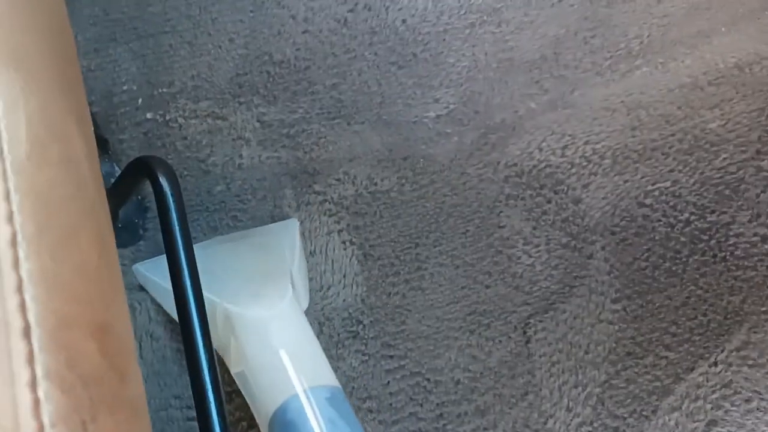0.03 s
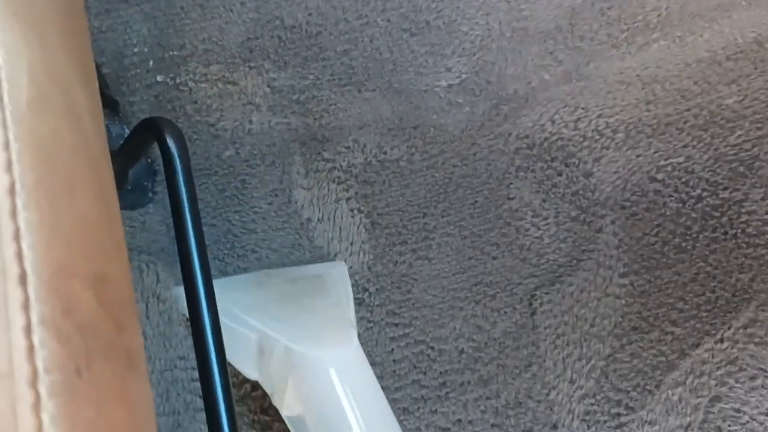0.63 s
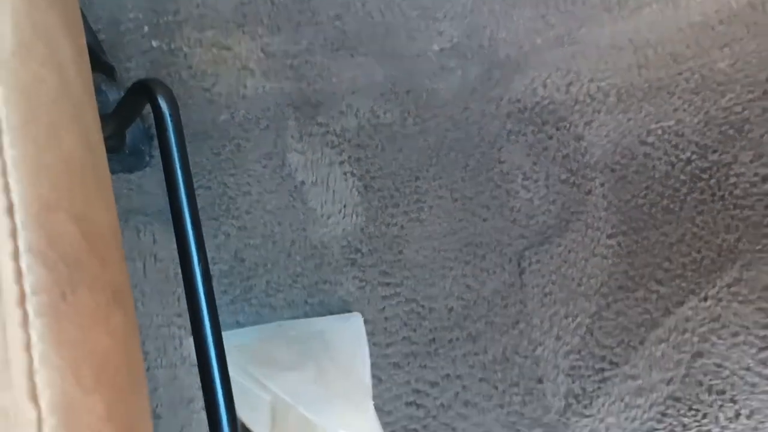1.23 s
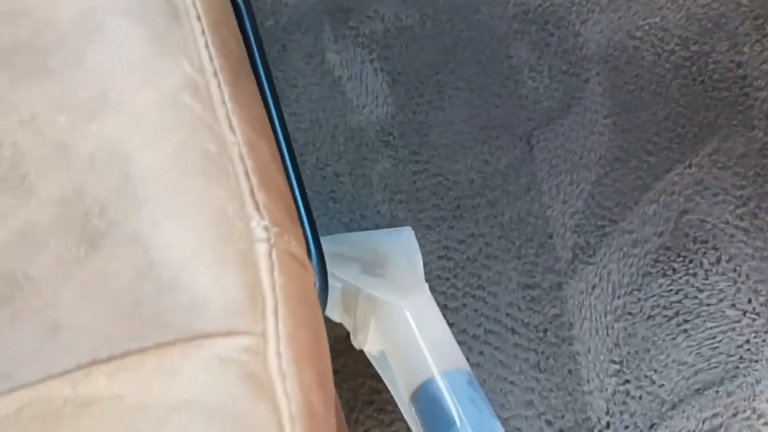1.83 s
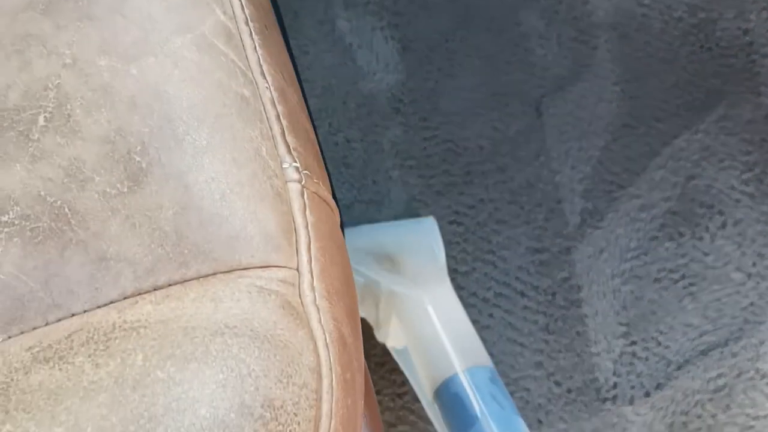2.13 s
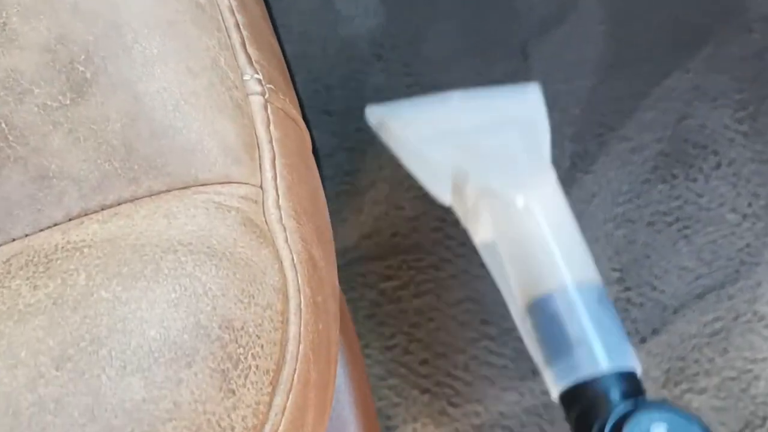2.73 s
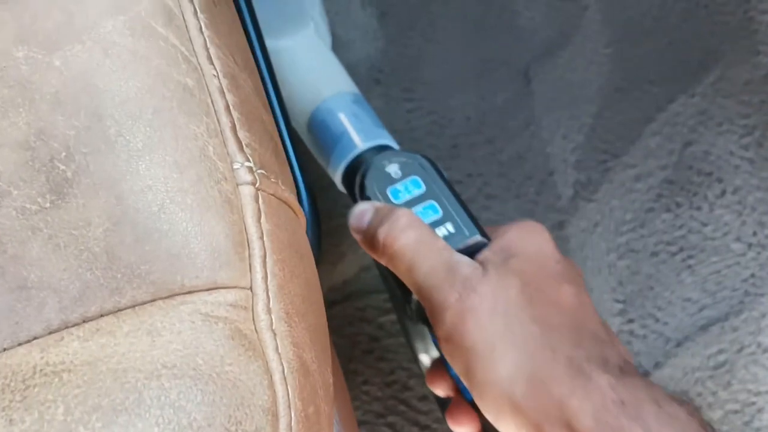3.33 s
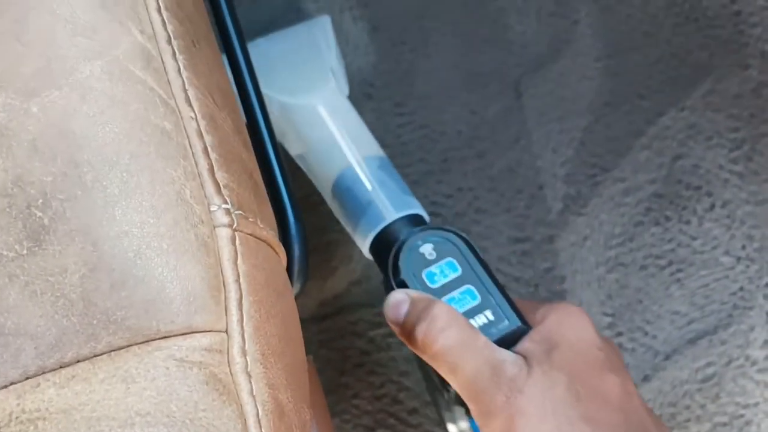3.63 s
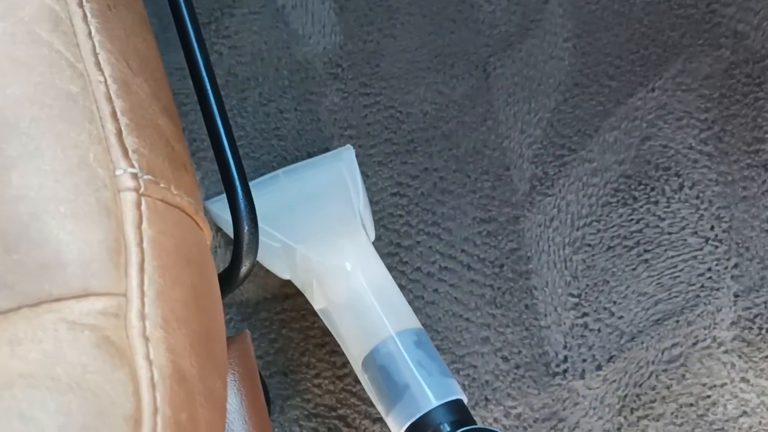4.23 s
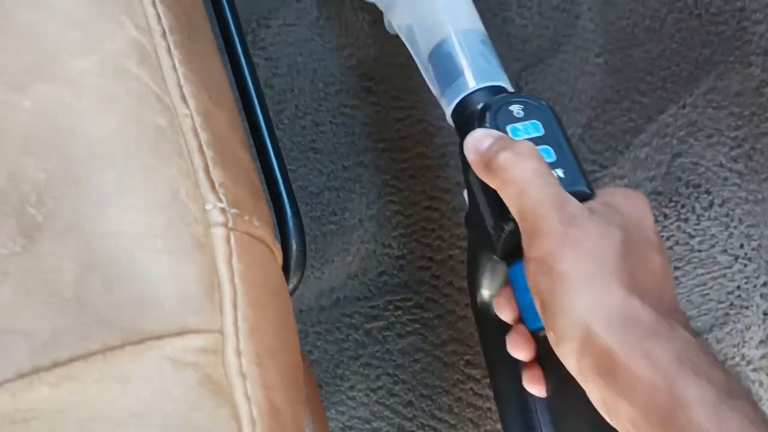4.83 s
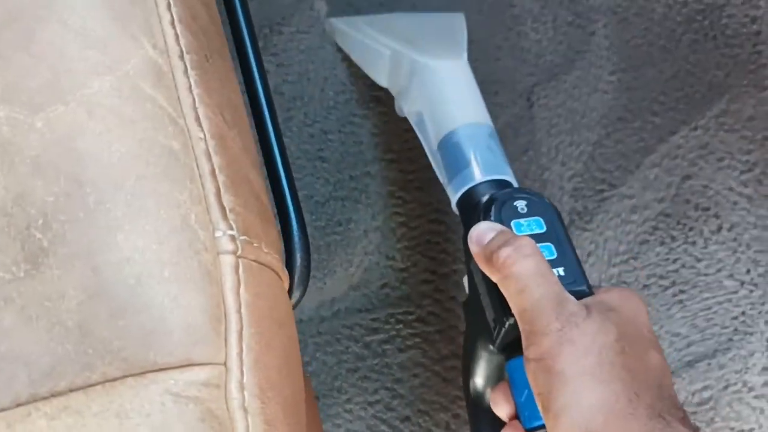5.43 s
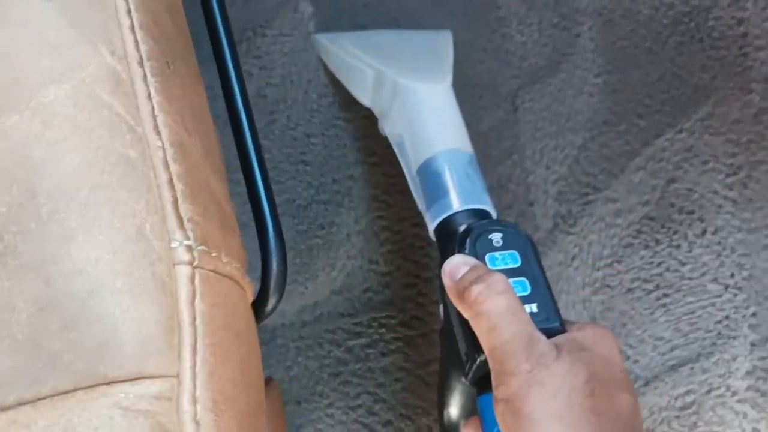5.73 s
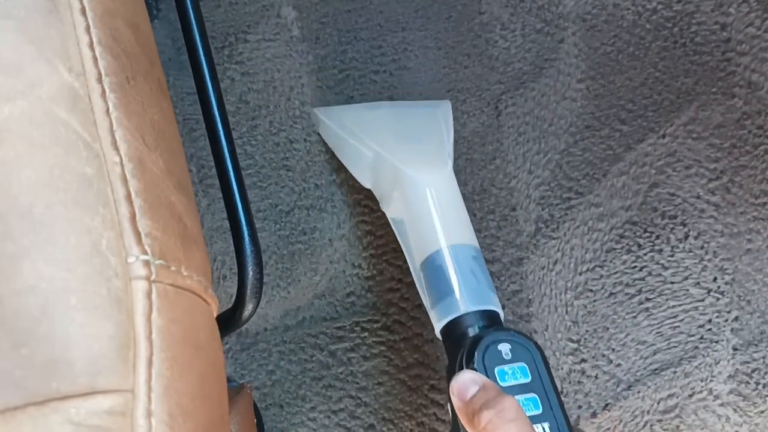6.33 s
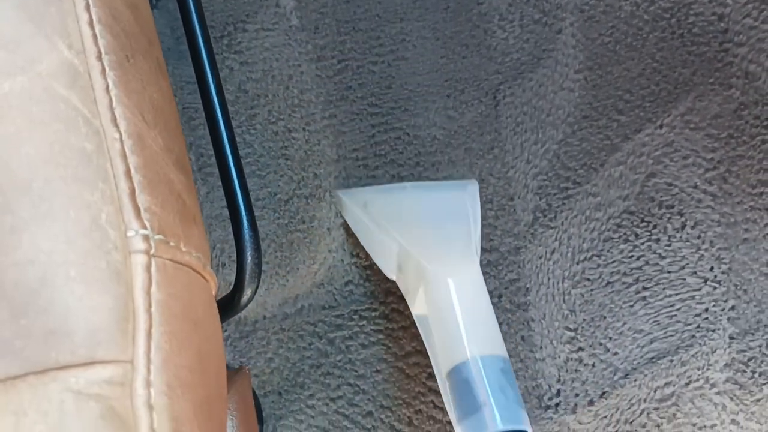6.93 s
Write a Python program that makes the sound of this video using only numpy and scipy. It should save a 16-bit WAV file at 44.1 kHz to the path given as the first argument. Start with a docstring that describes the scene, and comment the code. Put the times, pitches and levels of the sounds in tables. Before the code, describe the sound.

Loud, wet hiss of a vacuum nozzle on soaked carpet, whistling and slurping, then dropping as it seals and the motor whines.

```python
"""A loud, wet hiss with whistles and slurps: a wet vacuum draws water from a car footwell carpet, close up.
Air tears past the nozzle lip, coloured by how the nozzle lies, and sings in narrow wet gaps.
Behind it the hose roars, thumping when the flow is checked, and the motor hums. Twice the lip
seals on the carpet: the hiss falls and the unloaded motor speeds up and whines."""
import sys
import numpy as np
from scipy import signal
from scipy.fft import rfft, irfft, next_fast_len
from scipy.io import wavfile
from scipy.ndimage import uniform_filter1d

SR = 44100
rng = np.random.default_rng(int(sys.argv[2]) if len(sys.argv) > 2 else 0)


def transcribe(signal):
    """Save signal, clipped to [-1, 1], as a 16-bit WAV file at the path in sys.argv[1]."""
    frames = np.atleast_2d(signal).T
    limited = np.clip(frames, -1, 1)
    pcm = np.round(limited * 32767).astype(np.int16)
    wavfile.write(sys.argv[1], SR, pcm)


N = 308259
TIME = np.arange(N) / SR
FFT_SIZE = next_fast_len(N)
FREQS = np.maximum(np.fft.rfftfreq(FFT_SIZE, 1 / SR), 1)
TIP_OVER_S = 0.047

# Lip seals. Each row: start in seconds, initial grip (1 = settled), hold and release in seconds.
SEALS = [(2.555, 1.5, 0.026, .095), (5.004, 1.15, 1.1, 1.6)]
# Tilts onto the front lip. Each row: start, end and time to lie back in seconds, gulp in dB.
TILTS = [(0.614, 0.695, 1.4, -2), (2.75, 3.103, 0.041, 2), (4.64, 4.947, 0.038, 2)]
# Rumble of motor casing and shaking hose. Each row: frequency in Hz, relative level in dB.
RUMBLE_SPECTRUM = [(20, -46), (45, -22), (65, 3.5), (100, 4.5), (150, 0), (230, -3.5), (400, -19),
                   (1000, -36)]


def from_db(db):
    return 10 ** (np.asarray(db) / 20)


def rms(x):
    return np.sqrt(np.mean(x ** 2) + 1e-20)


def over_time(points):
    """Rows of (seconds, value) interpolated at every sample."""
    return np.interp(TIME, *np.transpose(points))


def over_freq(points):
    """Rows of (Hz, value) interpolated onto FREQS on a log axis."""
    hz, value = np.transpose(points)
    return np.interp(np.log(FREQS), np.log(hz), value)


def bell(offset, width):
    """Gaussian of height 1; full width at half height."""
    return np.exp2(-(2 * offset / width) ** 2)


def panned(x, pan_db):
    """Stereo; pan is left minus right level."""
    return x * from_db(np.array([[.5], [-.5]]) * pan_db)


def filtered(x, gain):
    """Apply a gain given on FREQS."""
    return irfft(rfft(x, FFT_SIZE) * gain, FFT_SIZE)[..., :N]


def complex_noise(shape):
    return rng.standard_normal(shape) + 1j * rng.standard_normal(shape)


def drift(rate_hz, step=32):
    """Slow random wander, rms 1."""
    hz = np.fft.rfftfreq(next_fast_len(N // step + 2, real=True), step / SR)
    slow = irfft(complex_noise(len(hz)) / (1 + (hz / rate_hz) ** 2))
    return np.interp(np.arange(N) / step, np.arange(len(slow)), slow / rms(slow))


def trapezoid(start_s, attack_s, hold_s, release_s):
    return np.interp(TIME, start_s + np.cumsum([0, attack_s, hold_s, release_s]), [0, 1, 1, 0])


def seal(close_s=0.017, settle_s=0.31):
    """Grip of the lip, 0 open, 1 settled; it snaps on tighter than it stays."""
    total = 0
    for start_s, grip, hold_s, release_s in SEALS:
        overshoot = (grip - 1) * np.exp(-np.maximum(TIME - start_s, 0) / settle_s)
        total += trapezoid(start_s, close_s, hold_s, release_s) * (1 + overshoot)
    return total


def tilt():
    """Tip of the nozzle onto its front lip, 0 to 1."""
    tips = sum(trapezoid(start_s - TIP_OVER_S / 2, TIP_OVER_S, end_s - start_s, back_s)
               for start_s, end_s, back_s, _ in TILTS)
    return np.minimum(tips, 1)


def pose_shares(tilt_share=0.75, rest_share=0.2):
    """Power shares of the poses: flat under the seat, pushed on the front lip, pulled, sealed."""
    # The nozzle is drawn clear of the seat. Each row: time in seconds, share of the flat pose.
    under_seat = [(0, 0.85), (2.5, 0.57), (2.9, 0.27), (3.2, 0.031)]
    sealed, flat = np.minimum(seal(), 1), over_time(under_seat)
    clear_of_seat = 1 - flat / flat.max()
    pushed = rest_share + tilt_share * tilt() * np.sqrt(clear_of_seat)
    open_shares = (flat, (1 - flat) * pushed, (1 - flat) * (1 - pushed))
    return [(1 - sealed) * share for share in open_shares] + [sealed]


def gulps_db(width_s=0.038, seal_db=2.5, seal_lead_s=0.026):
    """The lip gapes and gulps air before it tips, as it lies back and before it seals."""
    gulps = [(at_s, db) for start_s, end_s, back_s, db in TILTS
             for at_s in (start_s - width_s, end_s + TIP_OVER_S / 2 + back_s)]
    gulps += [(start_s - seal_lead_s, seal_db) for start_s, *_ in SEALS]
    return sum(db * np.exp(-((TIME - at_s) / width_s) ** 2) for at_s, db in gulps)


def choke_db(db_per_grip=-18):
    """The low rush drops while the grip is tighter than settled."""
    return db_per_grip * np.maximum(seal() - 1, 0)


def suction_db(open_slurp_db=-30.7, leak_exponent=2.8):
    """Slurp, hiss and spray levels: tilt trades slurp for hiss; a seal cuts all; hiss returns first."""
    # Lip flat and open; spray follows carpet wetness. Each row: time in seconds, level in dB.
    open_hiss = [(0, -24.5), (1.3, -24.5), (2.3, -26), (2.97, -25), (3.12, -26.5), (3.5, -26), (4.5, -25),
                 (6.99, -27.5)]
    open_spray = [(0, -24), (.55, -26.5), (1.1, -24.5), (2.45, -24.5), (3.45, -24.5), (3.57, -27.5),
                  (4.9, -24.5), (6.0, -26.5), (6.99, -29)]
    tilted, sealed = tilt(), seal()
    slurp_db = open_slurp_db - 4 * tilted - 3 * sealed + gulps_db() + choke_db()
    hiss_db = over_time(open_hiss) + tilted - 4.5 * sealed ** leak_exponent
    spray_db = over_time(open_spray) + 0.5 * tilted - 7.5 * sealed
    return slurp_db, hiss_db, spray_db


def turbulence(spectrum, peaks=(), wall_delay_s=.00083, wall_cutoff_hz=2900):
    """Stereo air noise through resonances, mono rms 1; a side wall makes each side lead in turn by band."""
    # Each row: frequency in Hz, left-right correlation.
    stereo_correlation = [(60, 0.43), (300, 1), (640, 0.5), (1100, -0.08), (1850, -0.25), (2450, 0.37),
                          (3100, -0.07), (7000, -0.04), (15000, 0)]
    level_db = over_freq(spectrum)
    for hz, width_hz, left_db, right_db in peaks:
        level_db = level_db + np.array([[left_db], [right_db]]) * bell(FREQS - hz, width_hz)
    correlation = over_freq(stereo_correlation)
    wall_share = 0.56 / (1 + (FREQS / wall_cutoff_hz) ** 2)
    source, diffuse = rfft(rng.standard_normal((2, N)), FFT_SIZE)
    wall = -1j * np.sign(np.sin(2 * np.pi * FREQS * wall_delay_s)) * source
    mid = np.sqrt(1 + correlation) * source
    side = np.sqrt(1 - correlation) * (np.sqrt(wall_share) * wall + np.sqrt(1 - wall_share) * diffuse)
    air = irfft(np.array([mid + side, mid - side]) * from_db(level_db), FFT_SIZE)[:, :N]
    return air / rms(air.mean(axis=0))


def footwell_echoes(x, drift_hz=2.3, nearest_s=.0004, farthest_s=.007, count=9):
    """Short echoes off seat, rail and floor shift as the hand moves; the hiss rings hollow."""
    out, power = x.copy(), np.ones((2, N))
    for channel in range(2):
        for delay_s in np.geomspace(nearest_s, farthest_s, count) * np.exp(rng.normal(0, .1, count)):
            strength = .25 * drift(drift_hz)
            out[channel] += strength * np.roll(x[channel], round(delay_s * SR))
            power[channel] += strength ** 2
    return out / np.sqrt(power)


def nozzle(slurp_top_hz=1900, hiss_top_hz=5000, flutter_db=0.71, flutter_hz=8.9):
    """Air tears past the lip; water in the gap makes it flutter, a seal steadies it."""
    # Air at the lip. Each row: frequency in Hz, relative level in dB.
    open_spectrum = [(350, -30.5), (600, -15.5), (780, -14), (1100, -8.5), (1700, -5), (2300, 3),
                     (3500, 2.5), (5000, 2), (7300, -4.5), (8800, -3.5), (10000, -9), (11500, -17.5),
                     (13200, -21), (15300, -22.5)]
    sealed_spectrum = [(350, -27), (600, -29), (780, -8.5), (1200, -8), (1900, -2.5), (2700, 7.5),
                       (3600, 3), (5200, -1), (8000, -4.5), (10000, -4.5), (12300, -15.5), (15300, -15.5)]
    # Resonances in and around the nozzle. Each row: centre and width in Hz, left and right gain in dB.
    flat_peaks = [(797, 190, 5, 14), (1354, 350, 5.5, -6), (2210, 94, 6, -4.5), (2480, 500, 7, 8),
                  (3080, 310, 1, 2.5), (7760, 820, -3, 4)]
    pushed_peaks = [(790, 93, 4.5, 10.5), (1137, 52, 14, 2), (1358, 354, -16, 1), (1498, 180, 17.5, -5),
                    (2015, 130, -22, -5), (4030, 560, 3.5, 4.5), (5400, 570, -3.5, -13), (6400, 1900, 6, 8)]
    pulled_peaks = [(865, 53, -40, 14), (1260, 120, 0, 3), (2087, 140, 5.5, 4), (3850, 270, 5.5, -6),
                    (4310, 130, 6.5, 4.5), (5140, 1070, -5.5, -2.5), (6520, 330, 6, 8), (7400, 750, 7, 8)]
    sealed_peaks = [(920, 810, -2.5, 5), (1570, 91, 6, 1.5), (1700, 120, 7, -3), (2420, 360, 1.5, -1.5),
                    (2820, 330, -4, -4)]
    poses = [(open_spectrum, flat_peaks), (open_spectrum, pushed_peaks),
             (open_spectrum, pulled_peaks), (sealed_spectrum, sealed_peaks)]
    *open_air, sealed_air = [np.sqrt(share) * turbulence(*pose)
                             for share, pose in zip(pose_shares(), poses)]
    air = footwell_echoes(sum(open_air)) + sealed_air
    below_hiss = 1 / (1 + (FREQS / slurp_top_hz) ** 10)
    below_spray = 1 / (1 + (FREQS / hiss_top_hz) ** 10)
    # A wide gap slurps, a narrow one hisses, torn-off water sprays.
    bands = [below_hiss, below_spray - below_hiss, 1 - below_spray]
    looseness = 1 - 0.86 * np.minimum(seal(), 1)
    out = 0
    for band, level_db in zip(bands, suction_db()):
        part = filtered(air, band)
        running_rms = np.sqrt(uniform_filter1d(part.mean(axis=0) ** 2, size=SR // 8) + 1e-12)
        out += part / running_rms * from_db(level_db + flutter_db * looseness * drift(flutter_hz))
    return out


def roughness(width_hz, samples, size=4096, step=16):
    """Random amplitude and phase of a rough note, independent per channel, rms about 1."""
    hz = np.fft.fftfreq(size, step / SR)
    slow = np.fft.ifft(complex_noise((2, size)) * bell(hz, width_hz))
    slow /= rms(np.abs(slow))
    return np.array([np.interp(np.arange(samples) / step, np.arange(size), channel) for channel in slow])


def gap_notes(rows):
    """Air through a narrow wet gap sings a rough note, gliding as the gap changes."""
    out = np.zeros((2, N))
    for start_s, end_s, from_hz, to_hz, width_hz, level_db, pan_db in rows:
        span = np.arange(max(int(start_s * SR) + 1, 0), min(int(end_s * SR), N))
        progress = np.clip((TIME[span] - start_s) / (end_s - start_s), 0, 1)
        phase = 2 * np.pi * np.cumsum(from_hz + (to_hz - from_hz) * progress) / SR
        tone = np.real(roughness(width_hz, len(span)) * np.exp(1j * phase))
        envelope = np.sqrt(2 * np.abs(np.sin(np.pi * progress)))
        out[:, span] += panned(tone * envelope * from_db(level_db), pan_db)
    return out


def whistles(surge_db=1.3, surge_hz=16):
    """Gaps under the lip hold whistles that surge as water passes."""
    # Each row: start and end in seconds, start pitch, end pitch and width in Hz, level and pan in dB.
    held_notes = [(-.1, .65, 1404, 1378, 90, -35.5, -6), (.3, .62, 4320, 4310, 350, -26.5, -1),
                  (.65, 1.15, 7020, 6530, 200, -33.5, -17), (.7, 1.15, 2527, 2460, 250, -27, 3),
                  (.93, 1.32, 7550, 6870, 220, -24.5, -7), (1.1, 1.5, 2940, 2990, 220, -26, -2),
                  (1.33, 1.62, 6400, 6150, 260, -31, -6), (1.35, 1.9, 7430, 7730, 400, -27, -5),
                  (1.5, 1.98, 5670, 5820, 190, -31.5, -7), (1.65, 2.0, 6300, 6830, 190, -25, -5),
                  (1.75, 2.565, 2403, 2194, 340, -26.5, 1), (1.93, 2.45, 7780, 8200, 203, -26.5, -4),
                  (2.12, 2.36, 7580, 7270, 230, -27.5, -10), (2.33, 2.56, 7430, 6700, 229, -32, -4),
                  (2.75, 3.16, 6100, 5960, 170, -32, 0), (3.48, 3.85, 3044, 2990, 900, -25, -7),
                  (3.75, 4.08, 2570, 2500, 220, -28, -7), (3.9, 4.68, 1159, 1247, 70, -42, 12),
                  (5.05, 6.4, 1712, 1692, 32, -41.5, 4), (6.72, 7.154, 2370, 2330, 190, -26.5, 5),
                  (6.8, 7.15, 3230, 3220, 210, -26.5, -3)]
    return gap_notes(held_notes) * from_db(surge_db * drift(surge_hz))


def hose(roar_gain_db=-4.5, drone_peak_db=-37.5, drone_exponent=3.76):
    """The air column roars in its low resonances; the main one drones, growing faster than the flow."""
    # Air flow. Each row: time in seconds, relative level in dB.
    flow = [(0, -36), (.55, -36), (.7, -37.5), (2.8, -37), (3.1, -35), (3.7, -34.5), (4.3, -36),
            (6.99, -35.5)]
    # Each row: frequency in Hz, relative level in dB.
    roar_spectrum = [(10, -50), (45, -35), (75, -7.5), (190, 1.5), (300, 1), (500, 2), (700, -1),
                     (1000, 0.5), (2000, -43)]
    drone_spectrum = [(200, -58), (320, -19.5), (385, -0.5), (430, -3), (500, -8.5), (800, -59)]
    # Each row: centre and width in Hz, left and right gain in dB.
    resonances = [(371, 78, 2, 4.9), (580, 65, -7, 10.7), (735, 90, 5, 1)]
    flow_db = over_time(flow)
    drone_db = drone_peak_db + drone_exponent * (flow_db - flow_db.max())
    drone = from_db(drone_db) * turbulence(drone_spectrum)
    roar = from_db(flow_db + roar_gain_db + choke_db()) * turbulence(roar_spectrum, resonances)
    return roar + drone


def spin_up(lag_s=0.13):
    """Run-up of the unloaded motor, 0 to 1: rotor and air inertia put two lags on the seal."""
    pole = np.exp(-1 / (lag_s * SR))
    run_up = np.minimum(seal(), 1)
    for _ in range(2):
        run_up = signal.lfilter([1 - pole], [1, -pole], run_up)
    return run_up


def motor(blades=11, hum_hz=120, run_up_hz=31.3, tone_db=-54, waver_db=1.5, waver_hz=8):
    """Unbalance sounds once a turn, the impeller once a blade; windings hum, the casing rumbles."""
    # Lip open. Each row: time in seconds, turns per second.
    open_speed = [(.7, 607), (1.2, 620.5), (1.8, 618.5), (2.85, 593), (3.4, 594.5), (4.5, 588)]

    def tone(level_db, phase):
        return np.sqrt(2) * from_db(level_db + waver_db * drift(waver_hz)) * np.sin(phase)

    sealed, run_up = seal(), spin_up()
    speed_hz = over_time(open_speed) + run_up_hz * run_up
    jitter = 1 + 0.00061 * drift(rate_hz=11.8)
    angle = 2 * np.pi * np.cumsum(speed_hz * jitter) / SR
    hose_ring_db = 9 * bell(speed_hz - 591.7, width=37)   # shaft tone meets a hose resonance
    shaft_db = tone_db + 5.6 * sealed + hose_ring_db
    whine_db = tone_db + 8.3 * run_up * sealed
    hum_db = tone_db + 8.2 * sealed
    shaft = panned(tone(shaft_db, angle), pan_db=2.5)
    whine = panned(tone(whine_db, blades * angle), pan_db=8)
    hum = tone(hum_db, 2 * np.pi * hum_hz * TIME)   # twice the mains rate
    rumble = from_db(hum_db - 3) * turbulence(RUMBLE_SPECTRUM)
    return shaft + whine + hum + rumble


def chirps(low_hz=3400, high_hz=8700, width_hz=150, re_spray_db=-5.5, count=120):
    """Wet tufts open brief small gaps that sing in step with the spray level; a seal shuts them."""
    _, _, spray_db = suction_db()
    notes = []
    for when, length, pitch, glide, side in rng.random((count, 5)):
        start_s = when * TIME[-1]
        end_s = start_s + .04 + .1 * length
        from_hz = low_hz + pitch * (high_hz - low_hz)
        to_hz = from_hz * (1 + 0.049 * (glide - .5))
        level_db = spray_db[int(start_s * SR):int(end_s * SR)].min() + re_spray_db
        pan_db = 12 * (side - .5)
        notes.append((start_s, end_s, from_hz, to_hz, width_hz, level_db, pan_db))
    return gap_notes(notes) * (1 - np.minimum(seal(), 1))


def slurps():
    """A slug of water briefly narrows a gap and makes it ring."""
    # Each row: midpoint and length in seconds, pitch and width in Hz, level and pan in dB.
    slugs = [(.135, .05, 2350, 300, -24, -4), (0.432, .07, 2320, 220, -24, -2),
             (0.798, 0.075, 3000, 420, -23, 0), (0.813, 0.064, 2480, 240, -24, 0),
             (0.933, .04, 2500, 240, -24.5, 0), (2.546, .035, 3800, 280, -20.5, -1),
             (2.713, 0.041, 1990, 300, -28, -2), (2.732, 0.074, 903, 402, -32, -7),
             (2.96, 0.06, 6470, 170, -29, 0), (3.119, 0.064, 3860, 170, -24, 11),
             (3.848, 0.065, 2540, 450, -23, -7), (4.675, 0.073, 3090, 250, -23, 4),
             (4.785, 0.05, 6670, 200, -22, -1), (4.885, 0.07, 3830, 220, -22.5, 6),
             (4.953, 0.032, 3600, 350, -22, 0), (5.001, 0.045, 2790, 700, -22, -2),
             (6.401, .14, 2410, 400, -31, 3)]
    return gap_notes([(mid_s - length_s / 2, mid_s + length_s / 2, hz, hz, width_hz, level_db, pan_db)
                      for mid_s, length_s, hz, width_hz, level_db, pan_db in slugs])


def thumps(rise_s=0.0027, fall_s=0.012):
    """The lip catches on the carpet; the checked flow sets the hose booming and shaking."""
    # Each row: start in seconds, relative level in dB, length before decay in seconds, boom pitch in Hz.
    catches = [(1.44, -41, 0.031, 90), (2.549, -39, 0.047, 62.4), (3.177, -35, 0.03, 120),
               (3.271, -40, 0.02, 230), (3.63, -35, 0.08, 105), (3.772, -38.5, 0.2, 110),
               (3.969, -34, 0.094, 82), (5.005, -38.5, 0.046, 66.4)]
    shake = 0.65 * turbulence(RUMBLE_SPECTRUM)
    out = 0
    for start_s, level_db, length_s, hz in catches:
        age_s = np.maximum(TIME - start_s, 0)
        envelope = np.minimum(age_s / rise_s, 1) * np.exp(-np.maximum(age_s - length_s, 0) / fall_s)
        boom = 0.32 * np.sin(2 * np.pi * hz * age_s)
        out += from_db(level_db) * envelope * (boom + shake)
    return panned(out, pan_db=11.5)


def scene():
    """Nozzle close by, hose and motor behind it."""
    return nozzle() + whistles() + slurps() + chirps() + hose() + thumps() + motor()


def record(dry, cutoff_hz=15750):
    """The right microphone is duller than the left; the top treble is cut."""
    # Each row: frequency in Hz, left minus right level in dB.
    balance = [(100, 0), (400, 2.5), (700, 1), (4000, 0.5), (7400, 1.5), (8300, 5.5), (9800, 14),
               (11500, 9.5), (13500, 3), (15500, 5)]
    gains = panned(1, over_freq(balance))
    gains /= np.sqrt(np.mean(gains ** 2, axis=0))
    low_pass = signal.ellip(12, .1, 90, cutoff_hz, fs=SR, output="sos")
    return signal.sosfilt(low_pass, filtered(dry, gains))


dry = scene()
out = record(dry)
transcribe(out)
```